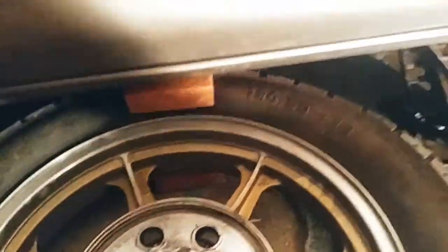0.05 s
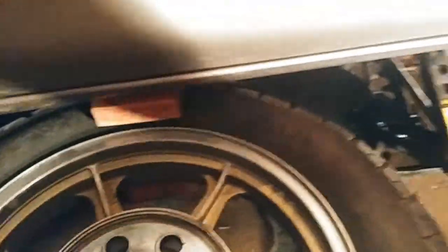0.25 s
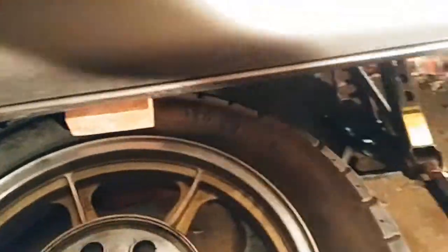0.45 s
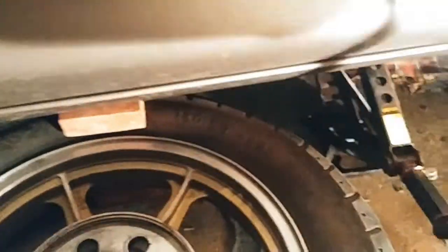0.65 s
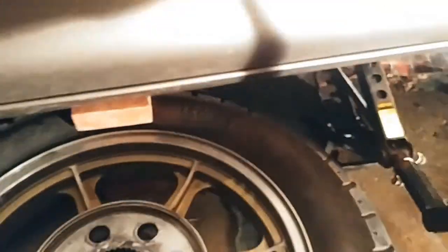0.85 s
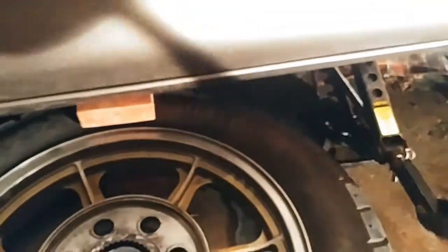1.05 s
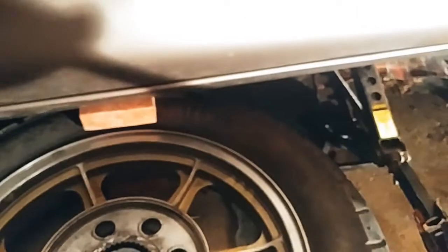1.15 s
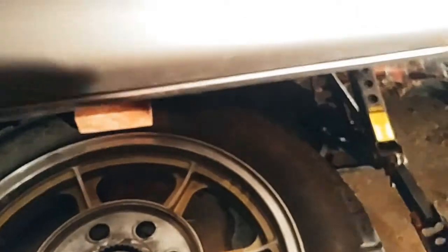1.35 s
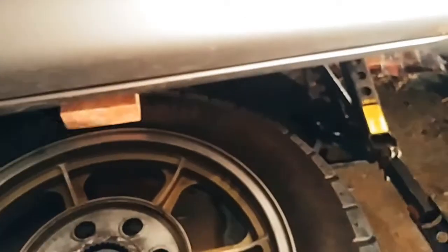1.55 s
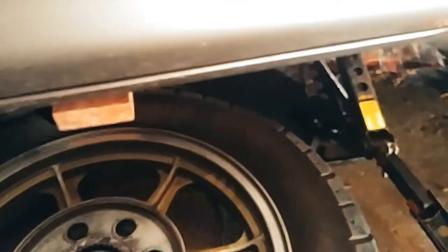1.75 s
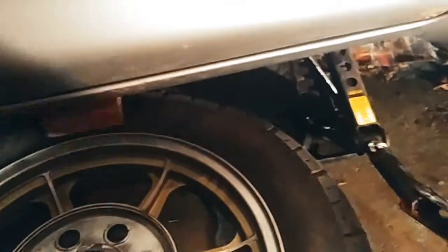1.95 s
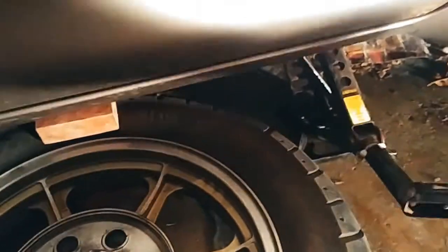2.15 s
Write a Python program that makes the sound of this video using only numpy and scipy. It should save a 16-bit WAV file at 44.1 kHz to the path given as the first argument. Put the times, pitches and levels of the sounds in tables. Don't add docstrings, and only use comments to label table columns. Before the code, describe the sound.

Scissor jack under a car slips with a hard metallic clank, then a softer duller one

```python
import sys
import numpy as np
from scipy import signal
from scipy.fft import rfft, irfft
from scipy.io import wavfile
from scipy.ndimage import uniform_filter1d

SR = 44100
rng = np.random.default_rng(int(sys.argv[2]) if len(sys.argv) > 2 else 0)


def volts(x):
    e = np.asarray(x, float) / 20
    return 10 ** e


def wav_out(sig):
    wavfile.write(sys.argv[1], SR, np.round(np.clip(np.atleast_2d(sig).T, -1, 1) * 32767).astype(np.int16))


N = 97020
T = np.arange(N) / SR

# t/s, crack peak/dB, chatter length/s, body boom/dB, tail/dB
CLANKS = [
    (0.2283, -12.5, 0.00573, -19.5, -23.5),
    (1.854, -19, 0.0019, -25, -34),
]
# f/Hz, density/dB per Hz
CRACK_SPECTRA = [
    [(250, -30), (330, -18), (560, -26), (900, -9), (1620, -3), (2190, -10.5), (3800, -7), (6440, -15.5),
     (8800, -23), (11400, -60), (19400, -120)],
    [(120, -49), (200, -31.5), (1300, -13), (1640, -6.5), (2810, -9), (4820, -22), (6200, -18), (8800, -46),
     (11400, -53.5), (19400, -120)],
]
# f/Hz, density/dB per Hz
TAIL_SPECTRA = [
    [(88, -38), (150, -1.5), (385, -6), (457, -2.5), (3330, -8), (6500, -20), (9000, -44.5), (11700, -62),
     (19800, -120)],
    [(88, 3.5), (150, -1), (581, -10.5), (987, -9.5), (1300, -10.5), (2670, -8.5), (6170, -32),
     (9000, -39.5), (11700, -62.5), (19800, -120)],
]
# f/Hz, t60/s
TAIL_T60 = [(300, 0.51), (1000, 0.5), (3000, 0.44), (6000, 0.53), (9000, 0.53)]
# f/Hz, t60/s, first slip level/dB, second slip level/dB
FRAME_MODES = [(292, .3, -28.5, -38.5), (604, .4, -37, -62), (653, 0.26, -35.5, -45),
               (777, 0.82, -40.5, -50), (900, 0.35, -26.5, -40), (969, 0.4, -33, -37),
               (1140, 0.1, -19.5, -28.5), (1374, 0.34, -23.5, -47), (1638, 0.065, -16, -13),
               (2645, .3, -38.5, -30), (2995, 0.18, -29, -43), (2332, 0.2, -36, -29.5),
               (3323, .2, -25, -48), (3733, 0.12, -23, -33)]
# f/Hz, level/dB, t60/s
BODY_MODES = [(57, -17, 0.3), (93, -16.5, 0.32), (112, -1, 0.23), (167.65, -11.5, .25)]
# f/Hz, level/dB, t60/s
HANDLE_MODES = [(770, -8, .12), (1370, -10, .1), (2380, -2, .07), (2875, -4, .07), (2990, -2, .085),
                (3790, 1, .08), (4745, 1, .05), (5670, -10, .05)]
# f/Hz, level/dB, t60/s
SOCKET_MODES = [(2510, 0, .04), (4150, 4, .04), (5090, 4, .03), (5460, 3, .04), (6380, -5, .04)]
# t/s, length/s, level/dB, favoured f/Hz, grit/dB
RUBS = [(0, 0.013, -37, 3280, -17.5), (.012, 0.11, -59, 3500, -3), (0.045, 0.028, -57, 2400, -12),
        (0, .025, -54, 780, -4), (0.436, 0.056, -56, 3000, -8.5), (.43, .11, -62.5, 3530, 4.5),
        (0.0058, .1, -72, 7500, 8.5), (1.645, 0.043, -70, 6300, 6), (0.565, 0.06, -57, 4250, -9),
        (0.739, 0.14, -56, 4306, -4.5), (1.222, 0.04, -64, 2220, -17.5), (1.238, 0.075, -63, 4300, 1),
        (1.387, 0.065, -65, 4230, 0), (1.467, 0.12, -65, 6200, 6), (1.4887, 0.065, -49.5, 2730, -7.5),
        (1.515, 0.041, -50.5, 4100, -11), (1.644, 0.04, -47, 2900, -11.5), (1.646, 0.04, -44.5, 4900, -16),
        (1.4984, 0.096, -50.5, 1370, -7.5)]
# t/s, peak/dB, centre f/Hz, t60/s
KNOCKS = [(0.630, -45, 1330, 0.026), (.630, -56, 2300, .02), (1.855, -35, 6100, .05),
          (1.855, -34, 2800, .04), (1.5, -47.5, 430, .1), (1.499, -41, 310, 0.37), (1.5, -47, 900, .07),
          (2.094, -59, 1370, .02), (0.632, -52, 550, .08), (1.838, -44.5, 1470, 0.044),
          (1.839, -51, 4000, 0.067)]
# t/s, length/s, level/dB, f/Hz
THUMPS = [(0.633, 0.024, -41, 90), (0.955, 0.037, -46, 85), (1.497, 0.065, -44, 150),
          (1.497, 0.13, -37.5, 90), (0.13, 0.035, -44, 90), (.405, .06, -37, 60), (.803, .025, -42, 85)]
# t/s, creep/dB, groan/dB, hiss/dB
SCREW_DRAG = [(1.15, -90.5, -95, -105), (1.27, -67, -90, -100), (1.36, -77, -97, -100),
              (1.52, -59, -90.5, -95), (1.63, -66, -77, -92), (1.70, -58.5, -63, -72),
              (1.725, -61.5, -74, -63), (1.80, -61.5, -62, -75), (2.0, -65.5, -54.5, -68),
              (2.08, -59, -59, -67.5), (2.14, -66, -51.5, -76.5), (2.18, -76, -63, -89)]
# f/Hz, width/Hz, level/dB
SCREW_MODES = [
    [(330, 96, 3.5), (700, 500, -3.5), (1400, 670, -1.5), (2020, 197.5, -2.5), (2300, 60, -12),
     (2650, 73, -11.5), (2920, 70, -11), (3258, 2700, -8.5)],
    [(296.7, 14, 0.5)],
    [(5860, 150, -2.5), (6150, 270, -2), (6006, 2100, -1.5)],
]
# t/s, level/dB
RUMBLE_LEVEL = [(0, -47), (.14, -47), (.2, -54), (.4, -46), (.55, -54), (.7, -56), (.85, -52), (.92, -46.5),
                (.98, -52), (1.02, -59), (1.18, -61), (1.25, -57), (1.34, -66), (1.4, -56), (1.6, -54),
                (1.8, -54.5), (2.1, -51), (2.2, -56)]
# f/Hz, density/dB per Hz
RUMBLE_SPECTRUM = [(21, -36), (35, -14.5), (52, -4), (96, -1), (211, -19.5), (339, -31), (600, -33),
                   (780, -60), (1320, -120)]
# f/Hz, density/dB per Hz
HISS_SPECTRUM = [(150, -37.5), (250, -5.5), (354, -2.5), (1170, -11.5), (4150, -16.5), (10000, -25.5),
                 (14500, -24), (17000, -24.5)]
# f/Hz, correlation/1
LIKENESS = [(100, 0.97), (300, 0.2763), (800, 0.43), (5000, 0.1)]
# f/Hz, level/dB
NEAR_LEFT = [(200, 5), (600, 4.5), (1300, 10), (5000, 15.5), (8500, 3.5)]
# f/Hz, phase/rad
NEAR_TURN = [(250, .1), (600, 1.0), (1200, 2.0), (4000, 1.6)]
# f/Hz, level/dB
FAR_LEFT = [(200, 5), (600, 6.5), (2000, 10), (6000, 12.5)]
# f/Hz, level/dB
FLOOR_LEFT = [(100, 5.5), (1000, 2.5), (12000, 2.5)]
# f/Hz, level/dB
HOUSING = [(1600, 0), (2100, -2), (3200, 2), (4900, -6), (6200, 4), (7600, -3)]


def rms_one(x):
    return x / np.sqrt(np.mean(x ** 2) + 1e-20)


def at_hz(points, hz):
    table = np.array(points)
    return np.interp(np.log(hz), np.log(table[:, 0]), table[:, 1])


def bandpass(x, low, high):
    return signal.sosfilt(signal.butter(2, [low, high], "band", fs=SR, output="sos"), x)


def drift(rate):
    r = np.exp(-80 * np.pi * rate / SR)
    noise = rng.standard_normal(N // 40 + 2002)
    slow = signal.lfilter([1], [1, -2 * r, r * r], noise)[2000:]
    return np.interp(np.arange(N) / 40, np.arange(len(slow)), rms_one(slow))


def ring(x, hz, t60):
    r = volts(-60 / (t60 * SR))
    w = 2 * np.pi * hz / SR
    return signal.lfilter([0, np.sin(w)], [1, -2 * r * np.cos(w), r * r], x + 1e-18)


def grains(per_s, spread_db):
    sizes = volts(spread_db * np.minimum(rng.exponential(1, N), 4)) * rng.choice([-1, 1], N)
    return rms_one(sizes * (rng.random(N) < per_s / SR))


def stroke(s, length):
    return np.sin(np.pi * np.clip((T - s) / length, 0, 1) ** .65) ** 2


def decay(s, t60, rise):
    u = np.maximum(T - s, 0)
    return (1 - np.exp(-u / rise)) * volts(-60 * u / t60)


def bands(white, spectrum, balance, shape):
    out, power = 0, 0
    edges = 25 * 2 ** np.arange(0, 9.6, .5)
    for k, (low, high) in enumerate(zip(edges, edges[1:])):
        hz = np.sqrt(low * high)
        if not spectrum[0][0] * .8 < hz < spectrum[-1][0]:
            continue
        mid, side = bandpass(white[k % 2], low, high)
        alike = np.clip(at_hz(LIKENESS, hz), 0, 1)
        gain = volts(at_hz(spectrum, hz))
        pair = np.sqrt(.5 + alike / 2) * mid + np.sqrt(.5 - alike / 2) * side * [[1], [-1]]
        lean = volts(at_hz(balance, hz) / 2 * np.array([[1], [-1]]))
        out = out + gain * shape(hz) * pair * lean
        power += gain ** 2 * (high - low) * 2 / SR
    return out / np.sqrt(power)


def near(x):
    hz = np.maximum(np.arange(N // 2 + 1) * SR / N, 1)
    to_right = volts(-at_hz(NEAR_LEFT, hz)) * np.exp(-1j * at_hz(NEAR_TURN, hz))
    return np.array([x, irfft(rfft(x) * to_right, N)])


def colour(x, spectrum):
    log_gain = at_hz(spectrum, np.maximum(np.arange(2048) * SR / 2048, 1)) * np.log(10) / 20
    cepstrum = irfft(log_gain[:1025])
    cepstrum[1:1024] *= 2
    cepstrum[1025:] = 0
    h = irfft(np.exp(rfft(cepstrum)))
    return signal.fftconvolve(x, h / np.sqrt(np.sum(h ** 2)))[:N]


def crack(k):
    s, db, length, _, _ = CLANKS[k]
    hold = np.clip((T - s) / 0.0046, 0, 1) * volts(-60 * np.maximum(T - s - length, 0) / 0.11)
    return volts(db) * colour(grains(6000, spread_db=1.5) * hold, CRACK_SPECTRA[k])


def frame(k):
    out = np.zeros(N)
    for hz, t60, *levels_db in FRAME_MODES:
        sway = volts(1.5 * drift(53))
        sine = np.sin(2 * np.pi * (hz * T + rng.random()))
        out += volts(levels_db[k]) * decay(CLANKS[k][0], t60, 0.0024) * sway * sine
    return out


def body(k):
    s, _, _, boom_db, _ = CLANKS[k]
    u = np.maximum(T - s, 0)
    out = np.zeros(N)
    for hz, level_db, t60 in BODY_MODES:
        swell = (1 - np.exp(-(u / .07) ** 2)) * volts(-60 * u / t60)
        out += volts(boom_db + level_db + 12.5) * swell * np.sin(2 * np.pi * (hz * u + rng.random()))
    return out


def clank_tail(k):
    s, *_, tail_db = CLANKS[k]
    stretch = (0.94, 1.14)[k]

    def fade(hz):
        return decay(s, stretch * at_hz(TAIL_T60, hz), 0.03) * volts(2.0 * drift(23))

    return volts(tail_db) * bands(rng.standard_normal((2, 2, N)), TAIL_SPECTRA[k], FAR_LEFT, fade)


def clanks():
    slips = range(len(CLANKS))
    direct = sum(crack(k) + frame(k) + body(k) for k in slips)
    return near(direct) + sum(clank_tail(k) for k in slips)


def handle():
    clicks = grains(1500, spread_db=2.5)
    out = np.zeros(N)
    _, _, db, favoured, grit_db = np.transpose(RUBS)
    strokes = np.array([stroke(s, length) for s, length, *_ in RUBS])
    for modes, force_db in ((HANDLE_MODES, db), (SOCKET_MODES, db + grit_db)):
        for hz, level_db, t60 in modes:
            drive = volts(force_db - 45 * np.log2(hz / favoured) ** 2) @ strokes
            shifted = np.roll(clicks, rng.integers(N))
            out += volts(level_db - 22) * ring(shifted * drive, hz, t60)
    for row, hz, level_db in zip(strokes, favoured, db + grit_db):
        out += volts(level_db) * row * rms_one(bandpass(clicks, hz / 1.3, hz * 1.35))
    return out


def knocks():
    out = np.zeros(N)
    noise = rng.standard_normal(N)
    for s, db, hz, t60 in KNOCKS:
        snap = volts(7) * (np.arange(N) == int(s * SR))
        burst = noise * decay(s, t60, 0.0001)
        out += volts(db + 18) * bandpass(burst + snap, hz / 1.25, hz * 1.25)
    return out


def thumps():
    out = np.zeros(N)
    for s, length, db, hz in THUMPS:
        out += volts(db) * stroke(s, length) * np.sin(2 * np.pi * hz * (T - s) + 1.8 * drift(25))
    return out


def screw():
    rub = grains(5200, spread_db=0.0)
    out = np.zeros(N)
    s, *levels_db = np.transpose(SCREW_DRAG)
    for modes, level_db in zip(SCREW_MODES, levels_db):
        for hz, width, db in modes:
            rings = rms_one(ring(ring(rub, hz, 2.2 / width), hz, 1.1 / width))
            out += volts(db + np.interp(T, s, level_db) + 1.2 * drift(26)) * rings
    return out


def squeak():
    line = rms_one(ring(rng.standard_normal(N), 14200, t60=0.022))
    return line * stroke(1.305, .13) * volts(-76) * volts([[0], [-4.0]])


def garage(x):
    t = T[:SR // 2]
    tails = rng.standard_normal((2, len(t))) * volts(-60 * t / .26) * (t > .004)
    tails /= np.sqrt(np.sum(tails ** 2, axis=1, keepdims=True))
    return volts(-15) * signal.fftconvolve(tails, x[None], axes=1)[:, :N] * volts([[0], [-5.0]])


def housing(x):
    cut = signal.sosfilt(signal.cheby2(12, 50, 9350, fs=SR, output="sos"), x)
    return np.array([colour(c, HOUSING) for c in cut])


def leak():
    rubs = sum(volts(db + grit_db) * stroke(s, length) for s, length, db, _, grit_db in RUBS)
    slips = sum(volts(db) * decay(s, .7, .02) for s, db, *_ in CLANKS)
    effort = volts(-11) * rubs + volts(-51) * slips
    high = signal.butter(4, 12010, "high", fs=SR, output="sos")
    return effort * signal.sosfilt(high, rng.standard_normal((2, N))) * volts([[0], [-4.0]])


def rumble():
    lump = drift(9)
    low = bands(rng.standard_normal((2, 2, N)), RUMBLE_SPECTRUM, FLOOR_LEFT,
                lambda hz: volts(0.8 * lump + 0.75 * drift(9.6)))
    low /= uniform_filter1d(np.mean(low ** 2, axis=0), size=3000) ** .4
    return low * volts(np.interp(T, *np.transpose(RUMBLE_LEVEL)))


def hiss():
    return volts(-69) * bands(rng.standard_normal((2, 2, N)), HISS_SPECTRUM, FLOOR_LEFT,
                            lambda hz: volts(0.2 * drift(7.3)))


def scene():
    small = near(handle() + knocks() + thumps() + screw())
    inside = housing(clanks() + small + garage(small[0]))
    return inside + leak() + squeak() + rumble() + hiss()


def low_pass(x):
    return signal.sosfilt(signal.butter(12, 16090, fs=SR, output="sos"), x)


def record(dry):
    low_cut = signal.butter(6, 44, "high", fs=SR, output="sos")
    return low_pass(signal.sosfilt(low_cut, dry))


dry = scene()
out = record(dry)
wav_out(out)
```